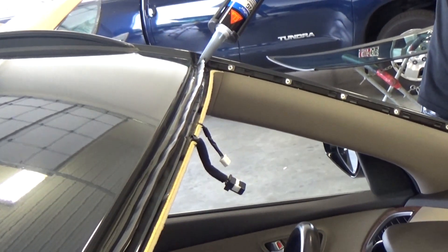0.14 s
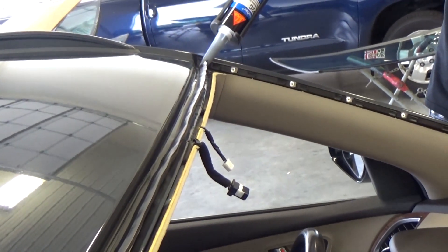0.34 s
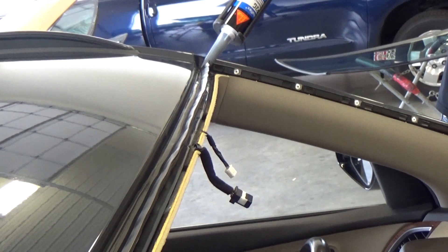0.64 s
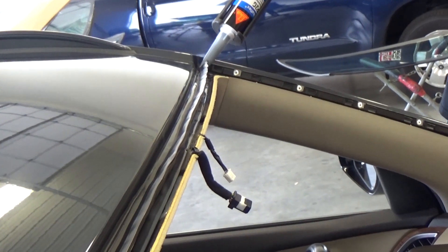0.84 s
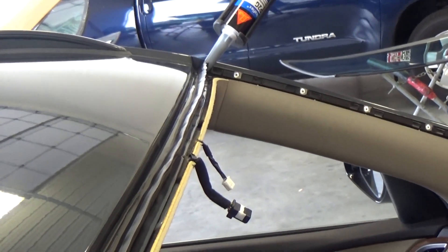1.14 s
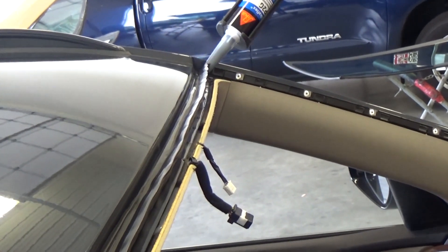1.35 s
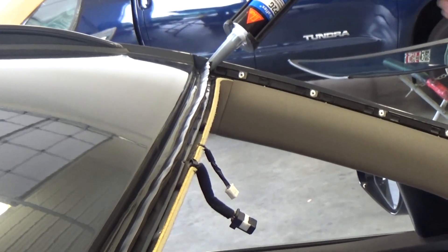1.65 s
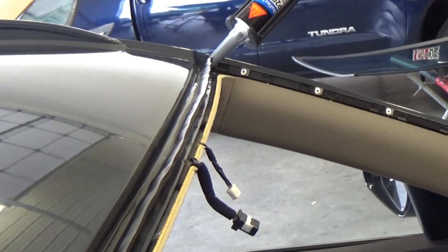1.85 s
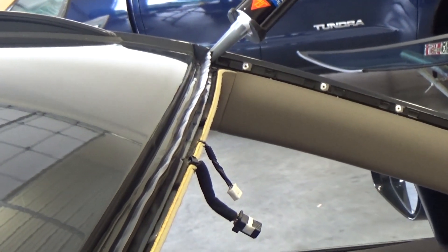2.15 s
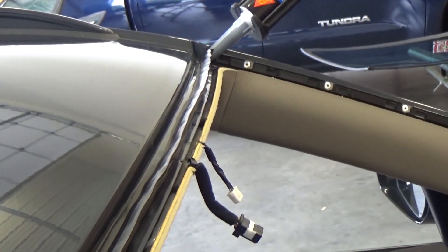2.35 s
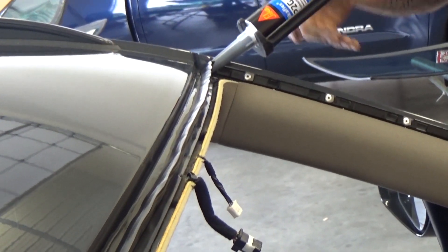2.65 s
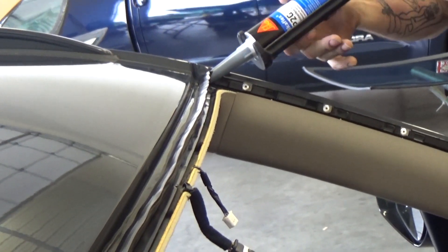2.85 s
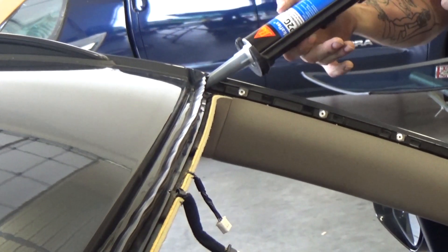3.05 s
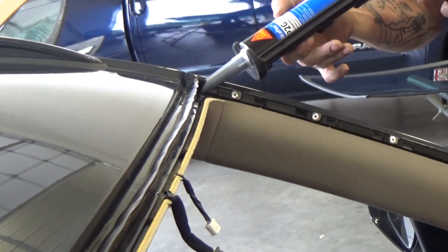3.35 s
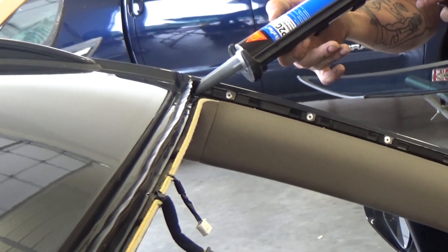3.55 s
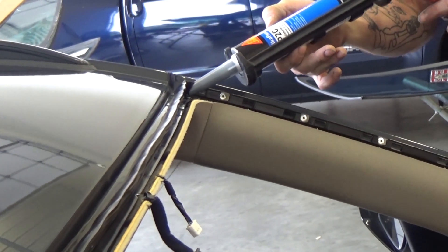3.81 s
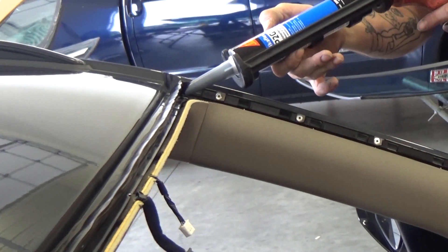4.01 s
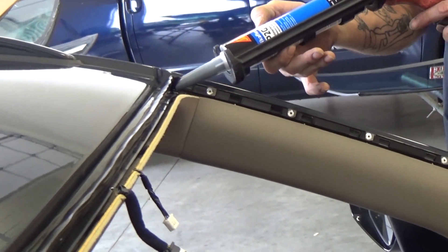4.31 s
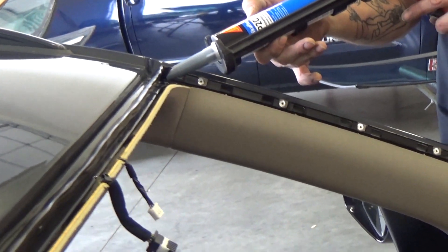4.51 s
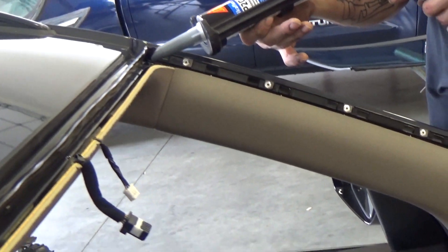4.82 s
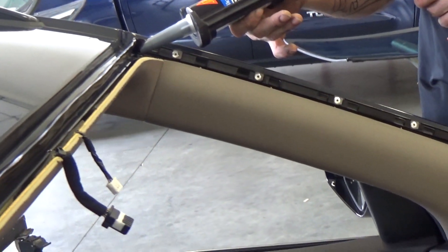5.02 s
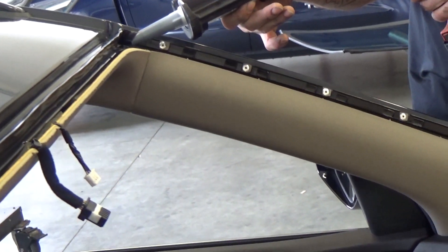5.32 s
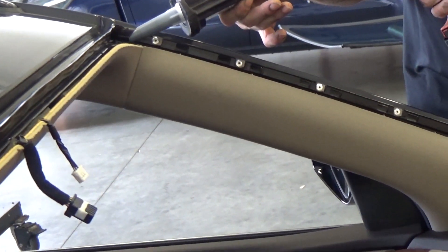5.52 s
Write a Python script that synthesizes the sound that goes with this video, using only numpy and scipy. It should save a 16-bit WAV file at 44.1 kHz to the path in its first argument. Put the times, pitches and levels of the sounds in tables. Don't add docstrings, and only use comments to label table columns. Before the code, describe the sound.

Close to a handheld camera in a workshop, an air-powered sealant gun streams air with a growing thin whistle for about a second. The whistle sags, tiny squeaks sound, and a bright exhaust jet bursts out and dies to a faint leak. After a pause with low fan and traffic rumble, a dull puff precedes a strong, steady hiss lasting to the end.

```python
import sys
import numpy as np
from scipy import signal
from scipy.fft import rfft, irfft, next_fast_len
from scipy.io import wavfile

SR = 44100
rng = np.random.default_rng(int(sys.argv[2]) if len(sys.argv) > 2 else 0)


def to_wav(s):
    ch = np.atleast_2d(s).T
    pcm = np.round(np.clip(ch, -1, 1) * 32767)
    wavfile.write(sys.argv[1], SR, pcm.astype(np.int16))


def gain_from_db(level_db):
    decades = np.asarray(level_db, float) / 20
    return 10 ** decades


N = 250047
FFT_SIZE = next_fast_len(N)
HZ = np.fft.rfftfreq(FFT_SIZE, 1 / SR) + 1e-3

# start_s, rush_db
FILL_FLOW = [(0.0, -23.5), (0.5, -25), (0.85, -24), (1.0, -21.5), (1.1, -24.5), (1.13, -25.5), (1.147, -35),
             (1.17, -25.5), (1.2, -27)]
# freq_hz, density_db (per Hz)
FILL_COLOUR = [(700, -24), (1100, -18), (1400, -10), (1700, -6), (2450, -12), (2800, -5), (3250, -9.5),
               (3600, -1.5), (4400, -5), (5600, -6.5), (7500, -7), (10300, -7.5), (13000, -11.5),
               (15700, -20)]
# freq_hz, width_hz, level_db
PASSAGES = [(1970, 130, 3.5), (2220, 135, 7.5), (5600, 200, 2), (6300, 290, -7), (8200, 180, -4.5),
            (8720, 290, -0.5), (10150, 340, 2), (10900, 400, 0.5), (11900, 400, -5)]
# centre_s, half_length_s, level_db
BODY_SWELLS = [
    (0.36, 0.06, 2),
    (0.78, 0.065, 2.5),
    (0.95, 0.07, 0),
]
BARREL_BODY_DB, BODY_DB_PER_RUSH_DB = -0.1, -0.6

# harmonic, level_db
WHINE_PARTIALS = [(1, -9), (2, -4), (3, 1.5), (4, -0.5)]
# start_s, pitch_hz
WHINE_PITCH = [(0, 914), (.99, 914), (1.03, 897), (1.048, 879), (1.064, 830), (1.2, 800)]
# centre_s, half_length_s, level_db
WHINE_CHOKES = [
    (0.33, 0.084, -9),
    (0.71, 0.038, -15),
    (0.93, 0.065, -1),
]
WHINE_START_DB, WHINE_GROWS_DB_PER_S = -38.5, 10.0
WHINE_ENDS_S, WHINE_DIES_DB_PER_S = 1.062, 700
# pitch_hz, level_db
EDGE_TONES = [(2052, -43), (2200, -35.5), (2297, -37)]

# freq_hz, density_db (per Hz)
RUMBLE_COLOUR = [(12, -50), (20, -32), (70, -11.5), (104, -6), (260, -1), (325, -1.5), (418, -2.5),
                 (584, -8), (1020, -10.5), (1500, -19), (2000, -21), (3500, -30), (6000, -54), (15700, -80)]
# start_s, gain_db
CAMERA_GAIN = [(0.0, 0.5), (1.15, 0), (1.25, -3.5), (1.33, -6), (1.36, -12), (1.5, -8.5), (1.8, -9.5),
               (2.93, -2.5), (3.2, -1.5), (3.24, -10), (3.275, -18), (3.6, -23.5), (5.2, -23), (5.67, -17)]
# centre_s, half_length_s, level_db
FAR_SWELLS = [
    (3.05, 0.12, 5),
    (3.6, 0.15, -11),
    (4.3, 0.21, 9),
    (4.85, 0.2, -14),
    (5.45, 0.54, 6),
]
RUMBLE_DB, DRONE_DB, RUMBLE_PAN_DB = -26.5, 0.43, -1.5
# freq_hz, density_db (per Hz)
HANDLING_COLOUR = [(12, -10), (25, -3), (50, 0), (90, -8), (200, -40)]
HANDLING_DB = -65.5
# freq_hz, level_db
STEREO_WIDTH = [(30, -52), (300, -28), (700, -37), (1500, -29.5), (4000, -22), (6000, -19.5), (9000, -13.5),
                (10700, -19), (11800, -21), (15000, -36)]

# centre_s, half_length_s, pitch_hz, level_db, glide_hz_per_s
SQUEAKS = [
    (1.062, 0.013, 4070, -23, -12000),
    (1.167, 0.023, 5560, -26, 0),
]

# start_s, port_tone_db, brightness_db
FIRST_BLOW = [(1.14, -41, -5), (1.155, -24.5, -11), (1.19, -28, -17), (1.205, -24, 6.5), (1.33, -22, 3),
              (1.49, -20, 1), (1.66, -28, -7), (1.9, -38, -11.5), (2.1, -44, -6)]
LEAK = [(2.35, -44.5, -1), (2.45, -39.5, 2), (2.62, -37.5, -1), (2.74, -42, -5), (2.92, -43.5, -4.5),
        (2.95, -36, -14), (3.1, -37.5, -3), (3.22, -35.5, -3), (3.243, -46, -2)]
BLAST = [(3.25, -22.5, 5), (3.36, -22, 1), (3.55, -21.5, 1), (3.75, -24.5, 4), (3.93, -22.5, 4),
         (4.17, -26.5, 9), (4.55, -21, 0.5), (4.95, -20, -1), (5.67, -22, 3)]
# freq_hz, density_db (per Hz)
JET_COLOUR = [(290, -59), (500, -25.5), (553, -24.5), (727, -24.5), (805, -22.5), (1150, -20),
              (1970, -16.5), (2180, -14.5), (2510, -13.5), (4740, -7.5), (5720, -0.5), (7630, -5.5),
              (10200, -3.5), (13000, -3.5), (15700, -9.5)]
JET_REGIONS_HZ = (1880, 4200, 5900, 8150, 10400, 14500)
# freq_hz, width_hz, level_db
PORT = [(2190, 150, -5), (4200, 430, -8), (6000, 350, 1.5), (6350, 200, -2), (10100, 640, -2.5)]
# centre_s, half_length_s, level_db
GULPS = [
    (1.195, 0.0065, -9),
    (1.285, 0.02, -3),
    (3.71, 0.018, -1),
    (3.85, 0.019, -3),
]
# centre_s, half_length_s, level_db
TONE_RINGS = [
    (3.265, 0.01, 4),
    (3.47, 0.07, 1.5),
    (4.6, 0.098, 2),
    (5.01, 0.05, 2),
]
# centre_s, half_length_s, body_db
SWINGS = [
    (3.31, 0.056, 2),
    (3.5, 0.17, 2.5),
    (4.1, 0.22, -1),
    (4.42, 0.073, 3),
    (5.6, 0.27, 3.5),
]
BODY_DB, BODY_DB_PER_TONE_DB, BODY_DB_PER_BRIGHT_DB = -9.0, -0.36, -0.017
TROUGH_DB, TROUGH_DB_PER_BRIGHT_DB = -5.5, 0.35
# lag_s, sway_s, level_db
GLASS = (0.00111, 0.000296, -15.5)

# start_s, level_db
SIGH_FLOW = [(2.92, -39), (2.938, -23.5), (3.012, -16.5), (3.06, -33), (3.064, -28), (3.214, -25),
             (3.246, -35), (3.25, -46)]
# freq_hz, density_db (per Hz)
SIGH_COLOUR = [(150, -8), (400, 0.5), (900, -0.5), (1300, -4.5), (2300, -10.5), (4000, -27), (9000, -37)]


def curve(tables, off_db=-110):
    s, *columns = np.transpose(np.vstack(tables))
    t = np.arange(N) / SR
    out = [np.interp(t, s, column) for column in columns]
    outside_s = np.maximum(s[0] - t, t - s[-1])
    out[0] = out[0] + off_db * np.clip(outside_s / 0.25, 0, 1)
    return out


def swells(rows):
    t = np.arange(N) / SR
    return sum(db * np.exp(-((t - at) / half) ** 2) for at, half, db in rows)


def at_hz(points, hz):
    point_hz, point_db = np.array(points).T
    return np.interp(np.log(hz), np.log(point_hz), point_db)


def rms_one(x):
    return x / np.sqrt(np.mean(x ** 2) + 1e-20)


def drift(rate):
    r = np.exp(-80 * np.pi * rate / SR)
    noise = rng.standard_normal(N // 40 + 2002)
    slow = signal.lfilter([1], [1, -2 * r, r * r], noise)[2000:]
    return np.interp(np.arange(N) / 40, np.arange(len(slow)), rms_one(slow))


def peaks(table):
    return np.sqrt(sum(gain_from_db(db) ** 2 / (1 + (2 * (HZ - hz) / width) ** 2) for hz, width, db in table))


def turbulence(shape, patchy_db, rate, shift_db=lambda hz: 0, count=14, low_hz=150, wide_db=0):
    mid, side = rfft(rng.standard_normal((2, FFT_SIZE))) * shape
    side = side * gain_from_db(at_hz(STEREO_WIDTH, HZ) + wide_db)
    left_right = np.array([mid + side, mid - side])
    scale = np.sqrt(np.mean(irfft(mid, FFT_SIZE) ** 2))
    centres = np.geomspace(low_hz, 14500, count)
    place = np.interp(np.log(HZ), np.log(centres), np.arange(count))
    together = drift(rate)
    out = 0
    for k, hz in enumerate(centres):
        band = np.clip(1 - np.abs(place - k), 0, 1)
        pair = irfft(left_right * band, FFT_SIZE, workers=2)[:, :N]
        waver_db = patchy_db * (0.5 * together + drift(rate))
        out = out + pair * gain_from_db(waver_db + shift_db(hz))
    return out / scale


def filling():
    t = np.arange(N) / SR
    rush_db, = curve([FILL_FLOW])
    body_db = BARREL_BODY_DB + BODY_DB_PER_RUSH_DB * np.maximum(rush_db + 24.5, 0) + swells(BODY_SWELLS)
    whine_db = WHINE_START_DB + WHINE_GROWS_DB_PER_S * t + swells(WHINE_CHOKES)
    whine_db = whine_db - WHINE_DIES_DB_PER_S * np.maximum(t - WHINE_ENDS_S, 0)
    shape = gain_from_db(at_hz(FILL_COLOUR, HZ)) * (0.66 + 0.96 * peaks(PASSAGES))
    rush = turbulence(shape, patchy_db=1.3, rate=8.2, shift_db=lambda hz: body_db * (hz < 4500),
                      count=7, wide_db=-2.5)
    tones = motor_whine(np.minimum(whine_db, rush_db)) + edge_tones(rush_db + body_db)
    return gain_from_db(rush_db + 4.5) * rush + tones


def motor_whine(level_db):
    t = np.arange(N) / SR
    steady_hz = np.interp(t, *np.transpose(WHINE_PITCH))
    sag = 1 - steady_hz / steady_hz[0]
    turns = np.cumsum(steady_hz * (1 + 0.00257 * drift(30.5))) / SR
    tones = 0
    for k, db in WHINE_PARTIALS:
        choke_db = -sag * (10.0 + 130.0 * (len(WHINE_PARTIALS) - k))
        flicker_db = 2.0 * drift(14)
        tone = np.sin(2 * np.pi * (k * turns + rng.random()))
        tones = tones + gain_from_db(db + choke_db + flicker_db) * tone
    return gain_from_db(level_db + 3.0) * tones


def edge_tones(rush_db):
    tones = 0
    for hz, db in EDGE_TONES:
        turns = np.cumsum(hz * (1 + 0.0072 * drift(15.5))) / SR
        tones = tones + gain_from_db(db + 4.8 * drift(11.0)) * np.sin(2 * np.pi * turns)
    return gain_from_db(rush_db + 25.0) * tones


def shop():
    low_db = RUMBLE_DB + curve([CAMERA_GAIN])[0]
    drone_db = DRONE_DB + swells(FAR_SWELLS)
    rumble = turbulence(gain_from_db(at_hz(RUMBLE_COLOUR, HZ)), patchy_db=0.38, rate=5,
                        shift_db=lambda hz: (drone_db + 1.5) * (hz > 450), count=6)
    pan = gain_from_db([[RUMBLE_PAN_DB / 2], [-RUMBLE_PAN_DB / 2]])
    return gain_from_db(low_db + 3.5) * rumble * pan


def handling():
    return gain_from_db(HANDLING_DB) * turbulence(gain_from_db(at_hz(HANDLING_COLOUR, HZ)), patchy_db=2.0, rate=3, count=2)


def squeaks():
    t = np.arange(N) / SR
    out = 0
    for at, half, hz, db, glide in SQUEAKS:
        since = t - at
        tone = np.sin(2 * np.pi * (hz + glide * since / 2) * since)
        out = out + gain_from_db(db) * np.exp(-(since / half) ** 2) * tone
    return out


def jet():
    tone_db, top_db = curve([FIRST_BLOW, LEAK, BLAST])
    ring_db = swells(TONE_RINGS)
    body_db = BODY_DB + BODY_DB_PER_TONE_DB * (np.maximum(tone_db, -46) + 21)
    body_db = body_db + BODY_DB_PER_BRIGHT_DB * top_db + swells(SWINGS) - ring_db
    trough_db = TROUGH_DB + TROUGH_DB_PER_BRIGHT_DB * top_db - ring_db
    tone_db = tone_db + swells(GULPS) + ring_db
    top_db = top_db - 1.5 * ring_db
    weak_db = 0.13 * np.minimum(tone_db + 17.0, 0)
    shifts = np.array([
        1.47 * (body_db + 10.0),
        0.5 * (body_db + 10.5),
        0 * tone_db,
        trough_db + 4.5,
        top_db - 1.7,
        top_db - 2.0 + weak_db])

    def region_shift(hz):
        weights = [np.interp(np.log(hz), np.log(JET_REGIONS_HZ), row) for row in np.eye(6)]
        return weights @ shifts

    shape = gain_from_db(at_hz(JET_COLOUR, HZ)) * (1.17 + 0.27 * peaks(PORT))
    hiss = turbulence(shape, patchy_db=0.3, rate=10.0, shift_db=region_shift, count=19, low_hz=1110)
    return gain_from_db(tone_db + 5.5 + 0.69 * drift(36)) * hiss


def sigh():
    puff = turbulence(gain_from_db(at_hz(SIGH_COLOUR, HZ)), patchy_db=0.5, rate=15, count=3)
    return gain_from_db(curve([SIGH_FLOW])[0] - 1.5) * puff


def off_glass(x):
    lag_s, sway_s, db = GLASS
    heard = np.arange(N) - SR * (lag_s + sway_s * drift(0.503))
    echo = np.array([np.interp(heard, np.arange(N), channel) for channel in x])
    return x + gain_from_db(db) * echo


def scene():
    gun = off_glass(filling() + jet())
    return gun + squeaks() + sigh() + shop() + handling()


def top_cut(x):
    return signal.sosfilt(signal.butter(12, 15740, fs=SR, output="sos"), x)


def record(dry):
    mix = 1.483 * np.tanh(dry / 1.518)
    return top_cut(mix)


dry = scene()
out = record(dry)
to_wav(out)
```